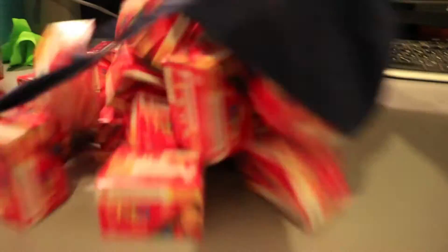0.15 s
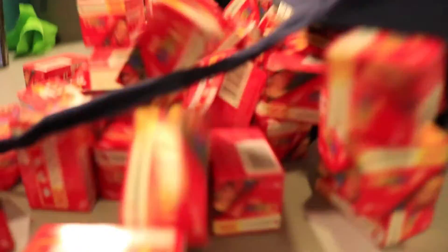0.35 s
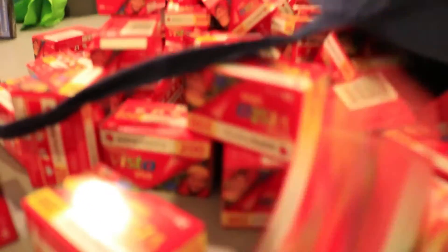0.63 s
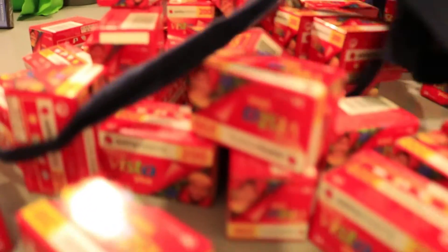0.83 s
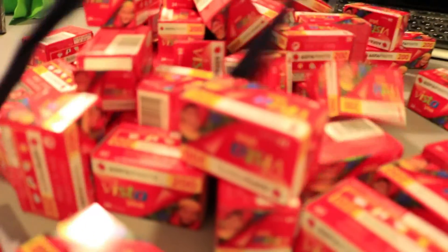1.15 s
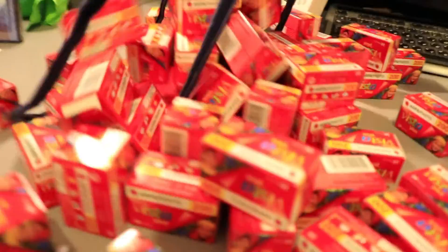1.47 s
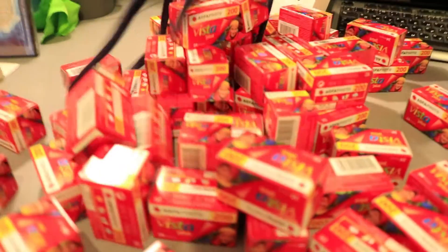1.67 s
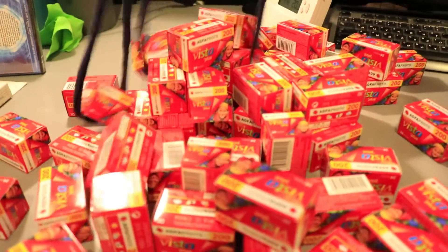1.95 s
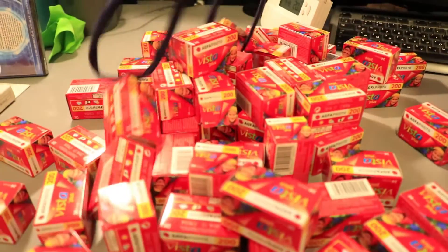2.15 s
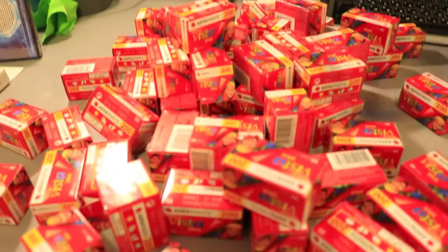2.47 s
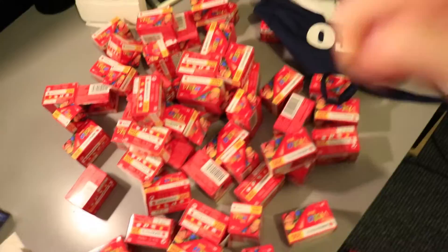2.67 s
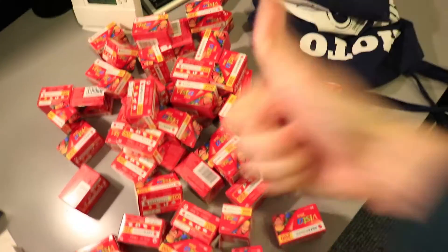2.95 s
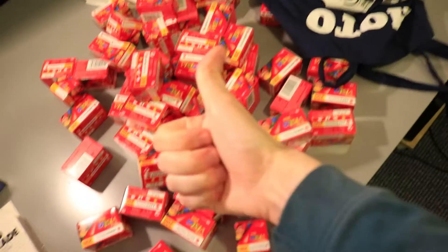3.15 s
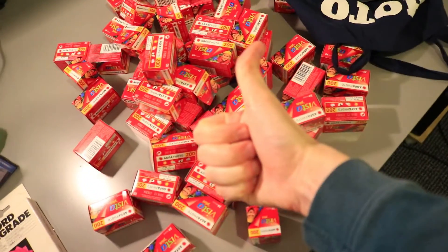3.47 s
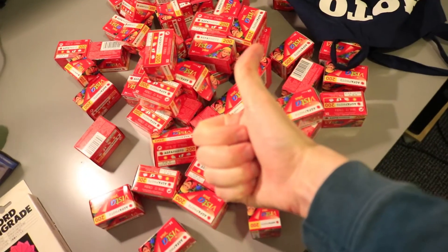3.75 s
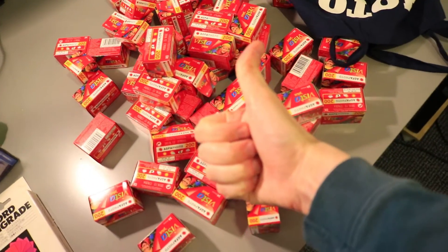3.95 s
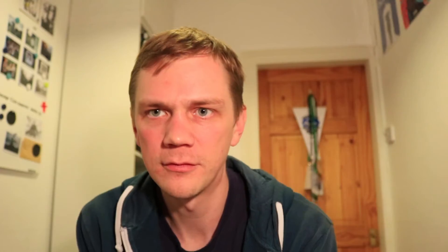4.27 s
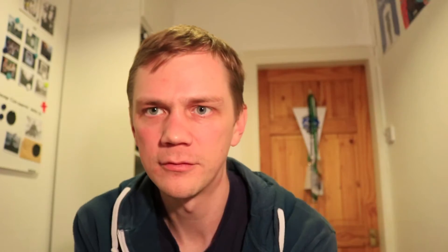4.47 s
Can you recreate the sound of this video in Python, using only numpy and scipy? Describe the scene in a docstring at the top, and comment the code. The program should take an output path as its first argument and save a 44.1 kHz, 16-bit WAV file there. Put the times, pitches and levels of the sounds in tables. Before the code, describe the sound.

A close, dry single-channel sound in a small quiet room. From 0 to about 0.6 s, small light cardboard boxes pour from a cloth bag onto a desk: dense, overlapping, hollow papery clacks with crisp corner ticks, coarse fabric scraping and a low desk rumble. Another cluster falls around 0.7-0.85 s, then the landings become sparser, with fresh bursts at 1.2-1.4 s and 1.5-2.0 s, and some strong single hits near 1.3, 1.6, 1.7 and 2.15 s. Boxes slide and settle between them, with faint cloth brushes. The last light contacts fade by 2.6 s. At 2.67 s a very loud, hollow knock stops dead within milliseconds. Near silence follows, with a brief swish and sinking soft puff at 2.97 s and barely audible sleeve movement around 3.1 and 3.8 s. At 4.12 s clothes rustle abruptly, continuing to the end, with small dull desk bumps around 4.26-4.32 and 4.46-4.48 s.

```python
"""Boxes poured onto a desk

Small cardboard boxes pour out of a cloth bag onto a desk, close to the microphone. Quick contacts at each
landing excite damped panel modes, with a faint treble haze around them, while random grains make the heap
slide and the cloth rustle beneath. A dry modal knock follows, then a sleeve's noise swish and sinking puff,
and grains of rustling clothes with a few bumps that ring the desk's low modes. Shaped noise forms the quiet
room underneath."""
import sys
import numpy as np
from scipy import signal
from scipy.fft import rfft, irfft, next_fast_len
from scipy.io import wavfile
from scipy.ndimage import uniform_filter1d

SR = 44100
rng = np.random.default_rng(int(sys.argv[2]) if len(sys.argv) > 2 else 0)


def bounce(signal):
    """Save signal as a 16-bit WAV file at the path given by the first command-line argument."""
    frames = np.transpose(np.atleast_2d(signal))
    limited = np.clip(frames, -1, 1)
    pcm = np.round(limited * 32767).astype(np.int16)
    wavfile.write(sys.argv[1], SR, pcm)


N = 203389
TIME = np.arange(N) / SR
RING = np.arange(2560) / SR  # time axis of one short ring [s]

# Box landings; hardness is below 0 flat on a face, above 0 on an edge or corner:
# (time [s], span of the contacts [s], strength [dB], hardness [dB])
BOX_LANDINGS = [(0.0171, 0.0044, -18, 4), (.0307, .0048, -21.5, 4.5), (0.0524, 0.0019, -16.5, 5.5),
                (0.0706, .0013, -18.5, 11), (.1175, .003, -19.5, 8), (0.1342, 0.0011, -16, -1.5),
                (0.1856, .0044, -17.5, 2), (0.1934, .0023, -16.5, 4.5), (0.2127, 0.0062, -20.5, -1),
                (0.2444, 0.0037, -16, 0.5), (0.2599, .0032, -17, 4), (.2985, 0.0066, -20, 4.5),
                (0.3119, 0.0049, -16, 3), (.3347, .0041, -16, -1), (.341, .0024, -17.5, -2.5),
                (0.3489, .001, -21, -8), (0.4101, 0.005, -24, -8), (0.4246, 0.0054, -17, 2),
                (0.4587, 0.0011, -21, 6.5), (.4654, 0.0012, -19.5, 5), (.4833, .0032, -17.5, -1.5),
                (.5138, 0.0023, -21, 1.5), (.551, 0.0012, -18, 7.5), (0.6254, 0.0026, -29, 6),
                (0.6584, 0.0025, -23.5, 1.5), (.6906, 0.0056, -17.5, 4), (0.7024, 0.0079, -19.5, 0),
                (.7148, 0.0024, -21, 3.5), (0.7254, 0.0032, -21.5, -4.5), (.7344, 0.0034, -21, -5.5),
                (0.7939, .0044, -21, -7), (.8167, 0.0062, -24, -0.5), (.845, 0.0023, -23, -3),
                (0.8532, 0.0026, -23.5, 1), (0.9608, 0.0017, -20.5, 7.5), (1.0216, 0.0055, -27, 2),
                (1.0636, 0.002, -28, -14), (1.0792, 0.0023, -27, -5.5), (1.1397, .0032, -24.5, 0.5),
                (1.2017, 0.0056, -23, 5.5), (1.24, 0.0026, -22.5, 4), (1.2606, 0.0047, -19.5, 2.5),
                (1.2723, 0.0039, -20.5, -1.5), (1.3137, 0.0018, -15, -1.5), (1.369, .0015, -19.5, -13),
                (1.5287, .004, -28.5, -4.5), (1.5484, 0.0028, -27, -2.5), (1.5821, 0.0037, -21.5, -7),
                (1.591, 0.002, -24, 7), (1.6154, 0.0026, -14.5, -6.5), (1.6718, 0.0018, -19.5, 8),
                (1.7122, 0.0038, -21.5, -2.5), (1.7242, 0.003, -15, -3), (1.783, 0.0018, -17, 1),
                (1.8878, 0.006, -18.5, -4), (1.8984, 0.0011, -24, 3.5), (1.994, 0.0023, -20, -8),
                (2.1198, 0.0065, -23, -3), (2.134, 0.0069, -22.5, 0), (2.1449, .0019, -14, -3),
                (2.2265, 0.0036, -29.5, 6.5), (2.2903, 0.00074, -25, 18.5), (2.3954, 0.003, -21.5, 1),
                (2.4143, .0015, -31, 11), (2.4604, 0.0032, -26, 0), (2.5846, .0012, -46, 8)]
TYPICAL_DB = -21  # landing strength at which the responses below are stated
# Frequency ranges of thump, panel, edge and crack: (low [Hz], high [Hz])
PART_BANDS = [(70, 350), (350, 1400), (1400, 4200), (4200, 16000)]
# How thump, panel, edge and crack answer a landing:
# (level at typical strength [dB], slope with strength [dB/dB], slope with hardness [dB/dB])
PART_RESPONSES = [(-27.5, 0.55, -0.06), (-22.6, 1.0, -0.63), (-20, 0.97, 0.5572), (-30.8, .92, 0.72)]
# Mean modes of a box: (multiple of the panel pitch [ratio], relative level [dB], t60 [s])
BOX_MODES = [(.2, -18, 0.037), (.6, -4.5, .02), (.95, 2.5, 0.017), (1.42, 4, .012), (1.95, -2, 0.012),
             (2.35, -1, 0.014), (3.5, -4, 0.015), (4.1, -1.5, 0.013)]
# Spectral colour of cardboard: (frequency [Hz], gain [dB])
CARDBOARD_COLOUR = [(35, -31.5), (60, -0.5), (103, -1.5), (227, -5.5), (458, -4), (621, -6), (749, -8),
                    (1340, -8), (1820, -4), (2350, -4), (3190, -1.5), (4320, -11.5), (8710, -20.5),
                    (14600, -33), (16000, -37)]
# Note of the desk top under a landing; its level is relative to the box's panels
DESK_TOP_HZ, DESK_TOP_T60_S, DESK_TOP_DB = 749.5, .028, -6.5
# Treble haze around each landing: level relative to the landing, exponential constant either side
HAZE_DB, HAZE_S = -25, .005
# The sliding heap, in surges as the bag is shaken and lifted:
# (time [s], rubbing gain [dB], desk rumble gain [dB])
HEAP_SURGES = [(0, -24, -27.5), (.22, -21.5, -28), (.48, -26, -36.5), (.63, -36, -36.5), (.72, -26.5, -33),
               (.78, -54, -36.5), (.955, -54.5, -52), (.97, -31.5, -33), (1.3, -31, -35.5),
               (1.41, -39, -43.5), (1.53, -32, -39.5), (1.68, -29, -46), (1.86, -42, -45.5),
               (2.14, -24, -34.5), (2.37, -49, -49.5), (2.44, -31.5, -35.5), (2.56, -54.5, -53.5),
               (2.65, -47, -63)]
STIR_DB, SETTLE_T60_S = -13, .19  # each landing jostles its neighbours, which then settle
TICK_T60_S = .006  # a corner slipping off a neighbour
# The bag's cloth dragging over the boxes: (time [s], gain [dB])
BAG_DRAG = [(0, -34.5), (.2, -35), (.35, -37.5), (.52, -52), (.6, -90.5)]
# The bag and its straps brushing the heap as they are lifted away:
# (middle time [s], Gaussian half length [s], gain [dB])
BAG_BRUSHES = [(1.101, 0.0077, -35), (1.22, .12, -47), (1.47, .012, -44), (1.66, .1, -46),
               (1.945, .025, -46), (2.11, .04, -41.5), (2.429, .009, -41)]
# Modes of the dry knock: (frequency [Hz], relative level [dB], t60 [s])
KNOCK_MODES = [(195, -17, 0.032), (374, -10, 0.025), (800, -0.5, .012), (1540, -7.5, 0.0083),
               (2715, -19, 0.018), (6870, -33, 0.0082)]
KNOCK_S, KNOCK_LENGTH_S, KNOCK_DB = 2.671, 0.0055, 4
# Spectral colour of the sleeve's swish: (frequency [Hz], gain [dB])
SWISH_COLOUR = [(700, -18), (1500, -13), (2200, -1), (3000, -6), (4200, 0), (9000, -1), (16000, -3)]
# Soft moves of the arm: (middle time [s], half length [s], gain [dB])
ARM_STROKES = [(3.107, .11, -55.5), (3.76, .12, -62)]
# Clothes of someone settling at the desk: (time [s], gain [dB])
CLOTHES_GAIN = [(4.12, -33.5), (4.21, -37), (4.32, -37.5), (4.38, -39), (4.54, -41.5), (4.6, -39)]
CLOTHES_START_S, CLOTHES_ATTACK_S = 4.115, 0.0053
# Spectral colour of cloth: (frequency [Hz], gain [dB])
CLOTH_COLOUR = [(120, -39.5), (200, -7.5), (328, -11.5), (1270, -7), (2420, -8), (2750, -2.5), (3190, -4.5),
                (5420, -21), (13100, -34.5), (16000, -40)]
# Bumps against the desk; all thuds share a further offset:
# (time [s], relative thud level [dB], click level [dB])
DESK_BUMPS = [(4.259, -22, -26), (4.277, -40, -30), (4.297, -28.5, -19), (4.319, -28.5, -32),
              (4.461, -27.5, -32.5), (4.480, -33.5, -27.5)]
# Mean modes of the desk: (frequency [Hz], relative level [dB], t60 [s])
DESK_MODES = [(49, -15, 0.45), (123, -6, 0.28), (207, -1.5, .11), (317, -3.5, 0.053), (473, 3, 0.034),
              (806, -3.5, 0.055)]
# Spectral colour of the quiet room: (frequency [Hz], gain [dB])
ROOM_COLOUR = [(14, -0.5), (28, -10), (50, -16), (80, -22.5), (280, -28.5), (450, -35.5), (1700, -40.5),
               (3000, -36.5), (4500, -41.5), (16000, -44.5)]
ROOM_DB = -48.5
TOP_HZ = 15900  # upper limit of the microphone's band


def undb(db):
    """Logarithmic level: decibels become an amplitude gain."""
    return 10 ** (np.asarray(db) / 20)


def level(x, db=0):
    """Root mean square: scale a steady sound to an rms level."""
    return x * undb(db) / np.sqrt(np.mean(x ** 2))


def blow(x, db):
    """Impulse energy: give a short sound the energy of 10 ms at this rms level."""
    return x * undb(db) * np.sqrt(.01 * SR / np.sum(x ** 2))


def fade(t, t60):
    """Exponential damping: amplitude falls 60 dB in t60 seconds."""
    return np.exp(-np.log(1000) * t / t60)


def curve(rows, axis=1):
    """Linear interpolation: one column of a table, joined by straight lines in time."""
    rows = np.array(rows)
    return np.interp(TIME, rows[:, 0], rows[:, axis])


def convolve(x, response):
    """Linear superposition: send x through a response, keeping its length."""
    size = next_fast_len(x.shape[-1] + response.shape[-1], True)
    return irfft(rfft(x, size) * rfft(response, size), size)[..., :x.shape[-1]]


def band(x, low_hz, high_hz, order=3):
    """Band limitation: a causal Butterworth band-pass."""
    edges = [low_hz, min(high_hz, .45 * SR)]
    return signal.sosfilt(signal.butter(order, edges, "band", fs=SR, output="sos"), x)


def colour(x, points, size=4096):
    """Minimum phase: a causal filter through (Hz, dB) points, along the last axis."""
    hz, db = np.transpose(points)
    bins_hz = np.arange(size // 2 + 1) * SR / size
    gain = undb(np.interp(np.log(bins_hz + 1), np.log(hz), db))
    # folding the cepstrum forward in time makes the filter causal
    cepstrum = irfft(np.log(gain))[:size // 2]
    cepstrum[1:] *= 2
    return convolve(x, irfft(np.exp(rfft(cepstrum, size))))


def add(out, s, x):
    """Superposition: mix x into out at time s."""
    i = max(int(s * SR), 0)
    out[i:i + len(x)] += x[:N - i]


def grains(rate, spread_db):
    """Random impulses: tiny contacts at a mean rate per second, a few much stronger than the rest."""
    size = undb(spread_db * np.minimum(rng.exponential(size=N), 4))
    return (rng.random(N) < rate / SR) * size * rng.choice([-1, 1], N)


def spill(wet_db=-17, room_t60=0.21):
    """Reverberation: the whole pour with a small room's short answer, ending at the knock."""
    dry = landings() + haze() + heap() + bag()
    t = TIME[:SR // 2]
    tail = band(rng.standard_normal(len(t)), 140, 7000, order=1) * fade(t, room_t60) * (t > .005)
    wet = convolve(dry, tail / np.linalg.norm(tail))
    return (dry + undb(wet_db) * wet) * (TIME < KNOCK_S)


def landings(panel_hz=790, size_spread=.06):
    """Impact excitation: boxes differ in pitch; strength and hardness set the balance of their parts."""
    out = np.zeros(N)
    times, spans, strength, hardness = np.transpose(BOX_LANDINGS)
    hits = []
    for span in spans:
        pitch_hz = panel_hz * np.exp(size_spread * rng.standard_normal())
        hits.append(convolve(contacts(span), box(pitch_hz)))
    hits = colour(np.array(hits), CARDBOARD_COLOUR)
    parts_db = [base_db + by_strength * (strength - TYPICAL_DB) + by_hardness * hardness
                for base_db, by_strength, by_hardness in PART_RESPONSES]
    for (low, high), levels_db in zip(PART_BANDS, parts_db):
        for s, part, db in zip(times, band(hits, low, high), levels_db):
            add(out, s, blow(part, db))
    # the desk top follows the panel level, halfway through the contacts
    for s, panel_db in zip(times + spans / 2, parts_db[1]):
        add(out, s, blow(desk_top(), panel_db + DESK_TOP_DB))
    return out


def contacts(span, clean_s=.002, rattle_db=-10, first_db=-5, count=14):
    """Contact force: a square landing is mostly one sharp strike; a glancing one touches and chatters too."""
    push = np.zeros(len(RING))
    glancing = np.clip(span / clean_s - .6, .1, 2)
    at = (rng.random(count) * min(2 * span, .03) * SR).astype(int)
    push[at] = glancing * undb(rattle_db) * rng.standard_normal(count)
    push[0] += glancing * undb(first_db)
    push[int(max(span - clean_s, 0) * SR)] += 1
    return push


def box(hz, crack_db=6, crack_t60=0.0073, scatter_db=2.3, detune=0.075, shiver_db=-15, shiver_t60=0.08):
    """Modal synthesis: damped panel modes, noise for the edge's crack, a faint shiver of flaps and contents."""
    ratio, db, t60 = np.transpose(BOX_MODES)[:, :, None]
    chance = rng.standard_normal((3, len(BOX_MODES), 1))
    modes_hz = hz * ratio * (1 + detune * chance[0])
    # the place of the blow decides which modes answer
    gains = np.sign(chance[1]) * undb(db + scatter_db * chance[2])
    modes = gains * np.sin(2 * np.pi * modes_hz * RING) * fade(RING, t60)
    crack = undb(crack_db) * fade(RING, crack_t60)
    shiver = undb(shiver_db) * fade(RING, shiver_t60)
    return modes.sum(0) + (crack + shiver) * rng.standard_normal(len(RING))


def desk_top(detune=0.037):
    """Single damped mode: a short woody note, a little different at each spot on the desk."""
    hz = DESK_TOP_HZ * (1 + detune * rng.standard_normal())
    return np.sin(2 * np.pi * hz * RING) * fade(RING, DESK_TOP_T60_S)


def haze():
    """Amplitude modulation: a faint treble noise swells just before each landing and fades just after it."""
    noise = colour(grains(rate=2500, spread_db=4), CARDBOARD_COLOUR)
    noise = level(band(noise, 6000, 16000, order=2))
    swell, t = np.zeros(N), RING - RING.mean()
    for s, span, db, _ in BOX_LANDINGS:
        first = max(-int((s + t[0]) * SR), 0)  # skip what falls before the start
        add(swell, s + t[0], undb(db + HAZE_DB) * np.exp(-np.abs(t[first:]) / HAZE_S))
    return noise * swell


def heap(rub_db=-2.8, hiss_db=-16.3, tick_db=-20, rumble_db=-1.0, desk_db=-5, count=7):
    """Granular friction: boxes of many pitches nudge each other, corners tick and the desk rumbles."""
    nudges = np.zeros(N)
    for hz in np.geomspace(620, 1020, count):
        nudges += signal.oaconvolve(grains(rate=130, spread_db=3.0), box(hz))[:N]
    nudges = colour(nudges, CARDBOARD_COLOUR)
    snap = rng.standard_normal(len(RING)) * fade(RING, TICK_T60_S)
    ticks = colour(convolve(grains(rate=170, spread_db=4), snap), CARDBOARD_COLOUR)
    ticks = band(ticks, 4200, 16000, order=2)
    body = level(band(nudges, 260.5, 4200), rub_db)
    hiss = level(band(nudges, 4200, 16000), hiss_db)
    rub = body + hiss + level(ticks, tick_db)
    noise = rng.standard_normal(N)
    low = level(band(noise, 30, 134.6, order=2))
    desk = level(band(noise, 105, 125, order=1), desk_db)
    rumble = level(low + desk, rumble_db)
    # surges and jostling add as powers
    rub_gain = np.hypot(undb(curve(HEAP_SURGES, axis=1)), stir())
    return rub * rub_gain + rumble * undb(curve(HEAP_SURGES, axis=2))


def stir():
    """Energy decay: each landing makes the jostling of the heap jump, then it quickly settles."""
    power = np.zeros(N)
    for s, span, db, _ in BOX_LANDINGS:
        add(power, s + span, (undb(db + STIR_DB) * fade(TIME[:SR // 2], SETTLE_T60_S)) ** 2)
    return np.sqrt(power)


def bag(body_db=8, brush_body_db=-2):
    """Stick-slip of coarse cloth: a bright scrape and a panel rasp as it slides off, then brushes the boxes."""
    drag = colour(grains(rate=9000, spread_db=2.5), CARDBOARD_COLOUR)
    scrape = level(band(drag, 3600, 16000, order=2))
    rasp = level(band(drag, 1400, 1950, order=1))
    brushes = sum(undb(db) * np.exp(-((TIME - s) / half) ** 2) for s, half, db in BAG_BRUSHES)
    snags = colour(grains(rate=1500, spread_db=4), CARDBOARD_COLOUR)
    snags = level(band(snags, 5000, 16000, order=2))
    sliding = (scrape + undb(body_db) * rasp) * undb(curve(BAG_DRAG))
    return sliding + (snags + undb(brush_body_db) * rasp) * brushes


def knock(crack_db=-25, crack_t60=.012):
    """Truncated modal ring: a loud hollow knock that stops dead after a few milliseconds."""
    out, t = np.zeros(N), TIME[:int(KNOCK_LENGTH_S * SR)]
    ring = np.zeros(len(t))
    for k, (hz, db, t60) in enumerate(KNOCK_MODES):
        # neighbouring modes start in opposite directions
        ring += (-1) ** k * undb(db) * np.sin(2 * np.pi * hz * t) * fade(t, t60)
    crack = band(rng.standard_normal(len(t)), 500, 6000, order=1) * fade(t, crack_t60)
    struck = ring + undb(crack_db) * crack
    add(out, KNOCK_S, undb(KNOCK_DB) * struck * signal.windows.tukey(len(t), .14))
    return out


def sleeve(peak_s=2.974, rise_s=0.011, fall_s=0.0042, hiss_db=-29.5, puff_db=-27,
           start_hz=140, end_hz=45, puff_s=0.018):
    """Noise burst and gliding tone: a quick swish, then a soft low puff that sinks in pitch."""
    t = TIME - peak_s
    hiss = level(colour(rng.standard_normal(N), SWISH_COLOUR), hiss_db)
    hiss *= np.exp(-np.abs(t) / np.where(t < 0, rise_s, fall_s))
    age = np.maximum(t, 0) / puff_s
    puff_hz = end_hz + (start_hz - end_hz) * np.exp(-2 * age)
    phase = 2 * np.pi * np.cumsum(puff_hz * (t > 0)) / SR
    puff = 2 * age * np.exp(-age ** 2) * np.sin(phase)
    return hiss + undb(puff_db) * puff


def clothes(flutter_db=1.5, flutter_s=0.017):
    """Stick-slip of fibres: uneven rustle from two soft arm moves, then someone settling at the desk."""
    flutter = level(uniform_filter1d(rng.standard_normal(N), int(flutter_s * SR)))
    fibres = level(colour(grains(rate=5000, spread_db=2.3), CLOTH_COLOUR))
    arm = sum(undb(db) / (1 + ((TIME - s) / half) ** 2) for s, half, db in ARM_STROKES)
    onset = np.clip((TIME - CLOTHES_START_S) / CLOTHES_ATTACK_S, 0, 1)
    body = undb(curve(CLOTHES_GAIN)) * onset
    return fibres * (arm + body) * undb(flutter_db * flutter)


def bumps(click_t60=.017, tail_db=-13, tail_t60=0.14, thud_db=2.5, dull_hz=4600):
    """Modal impact: each bump rings the desk's low modes under a dull click and a short rattle."""
    out, t = np.zeros(N), TIME[:SR // 2]
    for s, low_db, click_db in DESK_BUMPS:
        thud = np.zeros(len(t))
        for hz, db, t60 in DESK_MODES:
            mode_hz = hz * (1 + 0.054 * rng.standard_normal())
            thud += undb(db) * np.sin(2 * np.pi * mode_hz * t) * fade(t, t60)
        decay = fade(t, click_t60) + undb(tail_db) * fade(t, tail_t60)
        click = colour(rng.standard_normal(len(t)) * decay, CLOTH_COLOUR)
        click = band(click, 100, dull_hz, order=2)
        add(out, s, blow(thud, low_db + thud_db) + blow(click, click_db))
    return out


def room():
    """Stationary noise: the quiet rumble and hiss of the room."""
    return level(colour(rng.standard_normal(N), ROOM_COLOUR), ROOM_DB)


def scene():
    """Superposition: all sources sound together over the room, in one channel."""
    return (spill() + knock() + sleeve() + clothes() + bumps() + room())[None]


def record(dry):
    """Saturation and band limitation: peaks clip at full scale, then the top is cut."""
    clipped = np.clip(dry, -1, 1)
    return signal.sosfilt(signal.ellip(10, .2, 70, TOP_HZ, fs=SR, output="sos"), clipped)


dry = scene()
out = record(dry)
bounce(out)
```